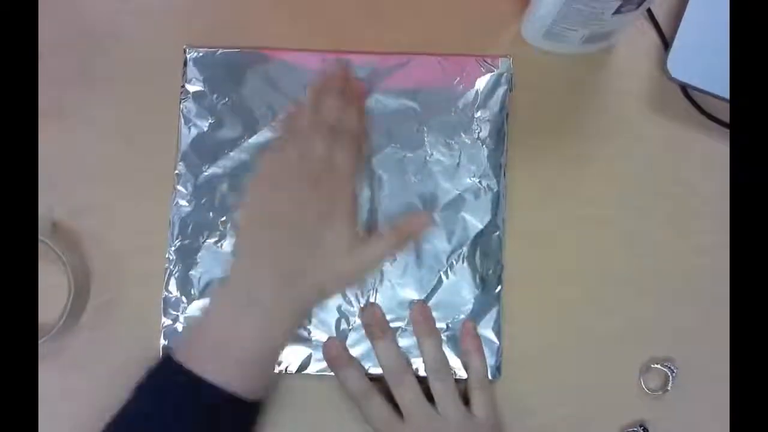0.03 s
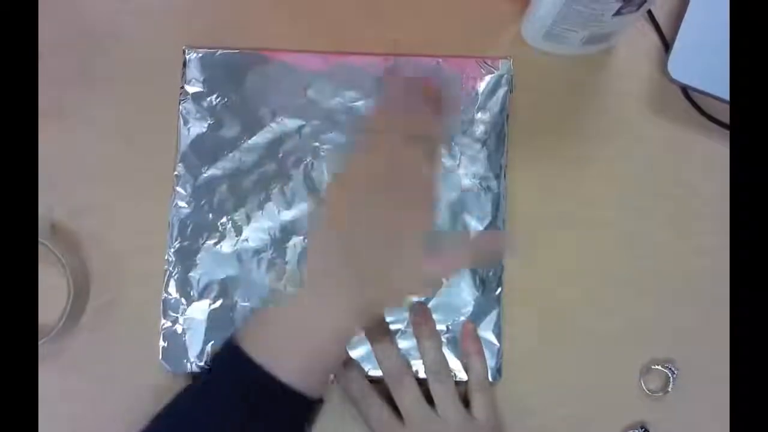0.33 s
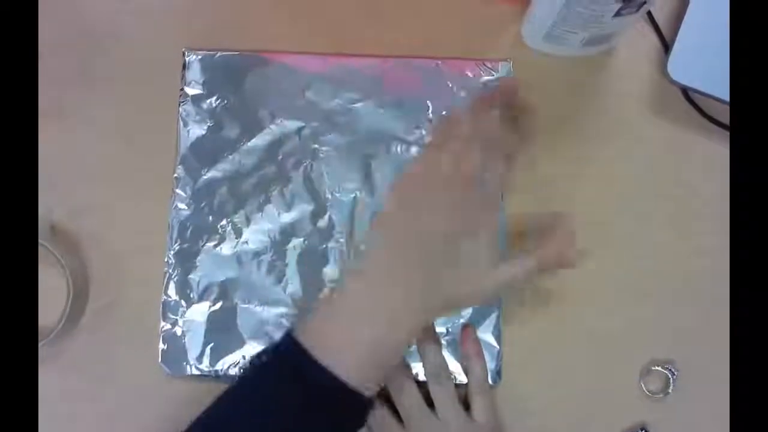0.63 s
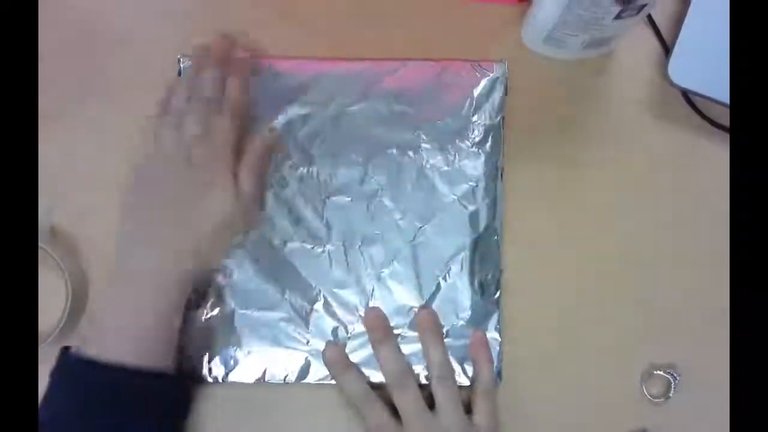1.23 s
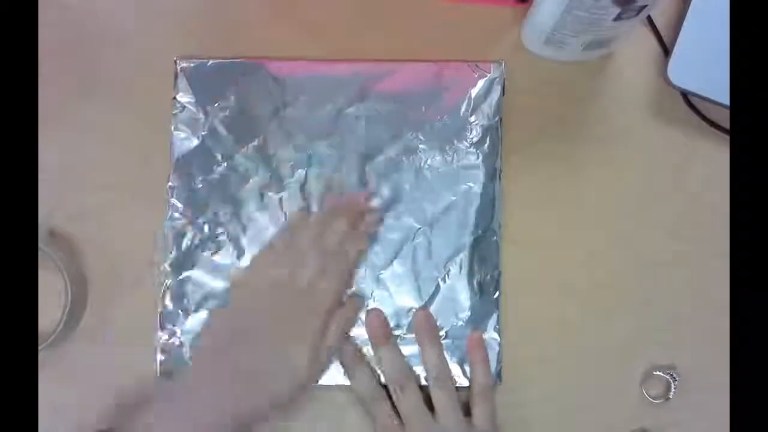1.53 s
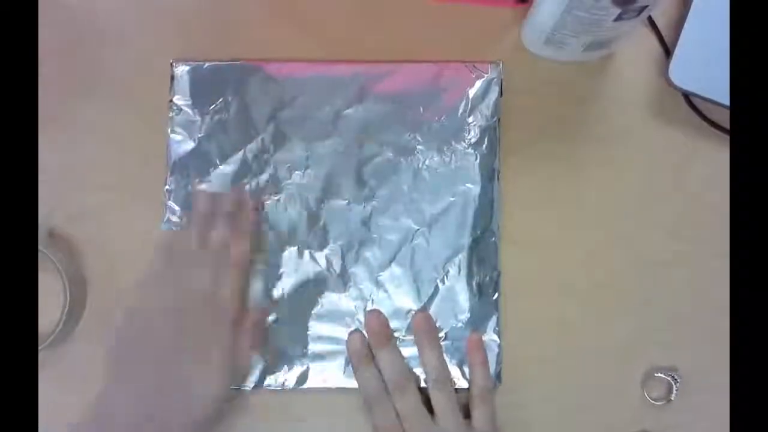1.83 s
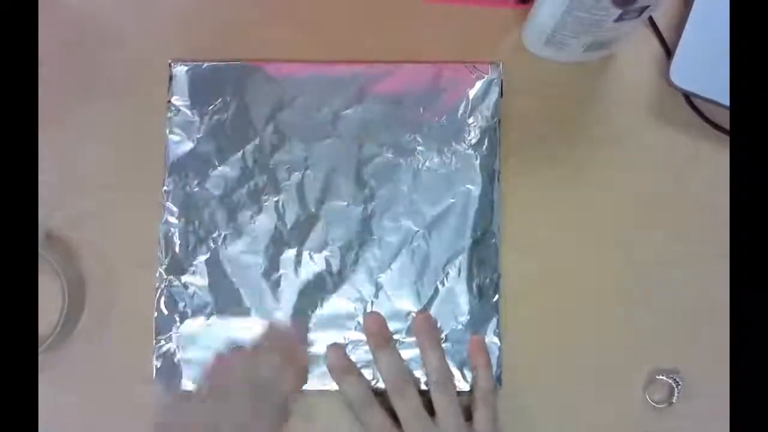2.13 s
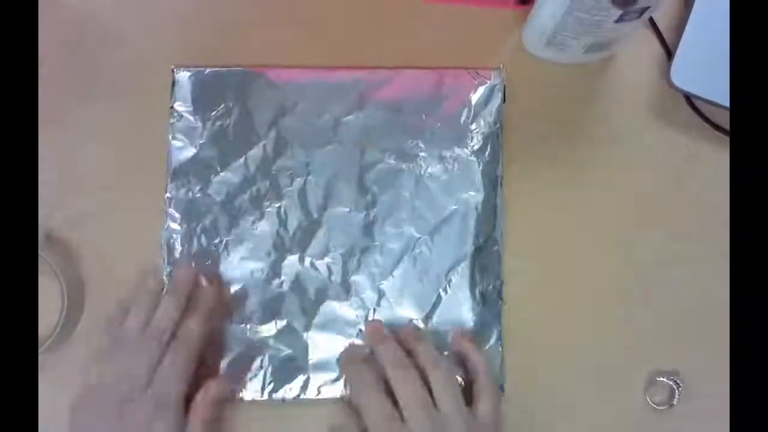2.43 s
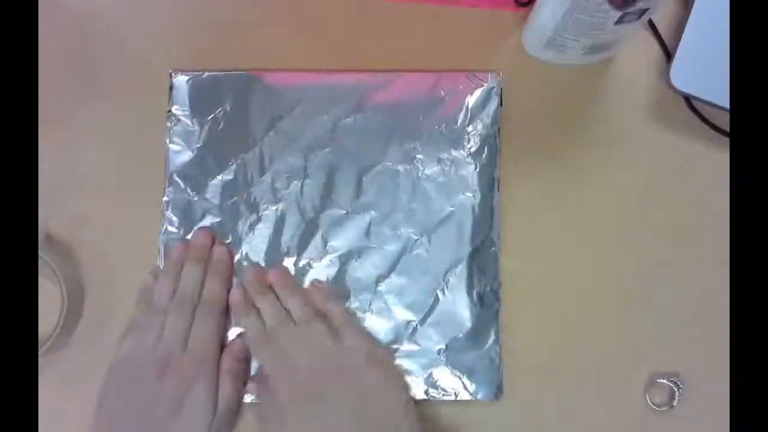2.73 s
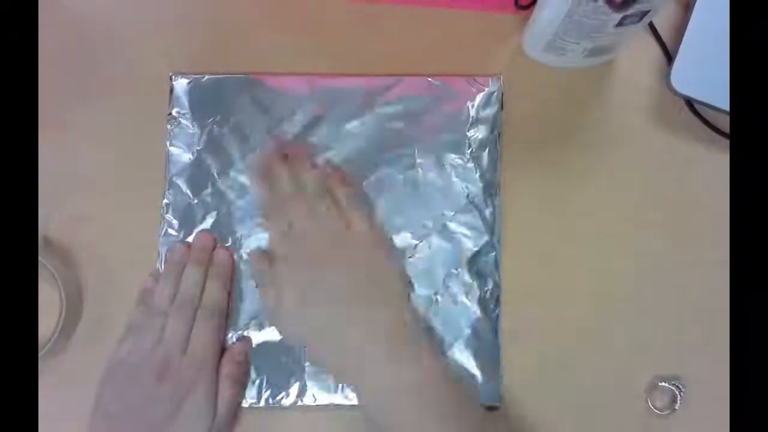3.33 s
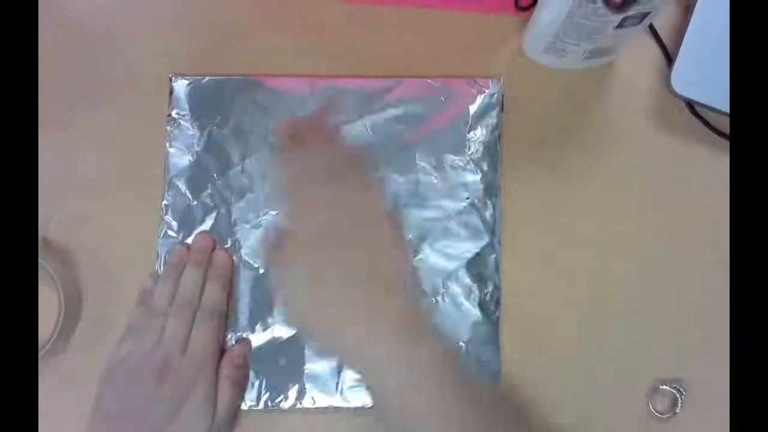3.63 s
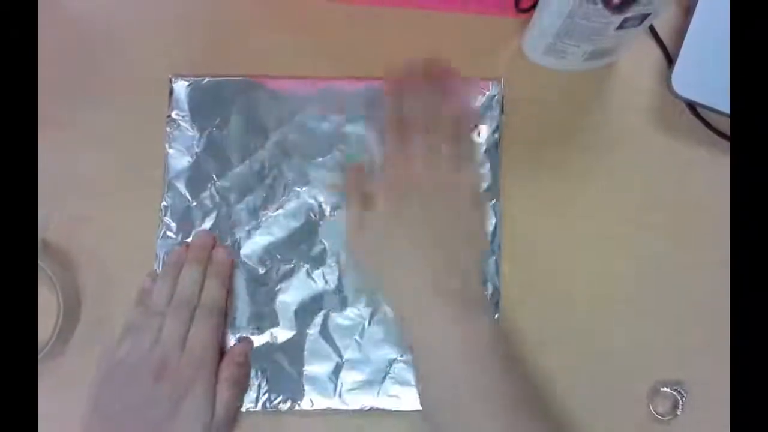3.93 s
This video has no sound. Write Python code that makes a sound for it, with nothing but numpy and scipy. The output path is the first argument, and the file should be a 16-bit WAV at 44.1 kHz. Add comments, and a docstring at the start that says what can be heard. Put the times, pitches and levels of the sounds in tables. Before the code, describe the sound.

Aluminium foil crinkles as a hand smooths it over a board in quick strokes, with a bright fizz and small snaps. It softens midway, then returns stronger, with faint palm bumps on the table, close up in a small room.

```python
"""Crinkled aluminium foil, smoothed by hand over a board on a table, heard close up in a small room.
Each stroke flattens tiny creases: they fizz in the treble, rattle the loose sheet and, under
pressure, scrape the board. Larger creases snap one by one, free facets ping, and the sheet
rustles between strokes. The palm bumps the table; faint room air lies underneath."""
import sys
import numpy as np
from scipy import signal
from scipy.fft import rfft, irfft
from scipy.io import wavfile

SR = 44100
rng = np.random.default_rng(int(sys.argv[2]) if len(sys.argv) > 2 else 0)


def dump(signal):
    """Clip the signal to [-1, 1] and save it as 16-bit WAV at the path in sys.argv[1]."""
    limited = np.clip(np.atleast_2d(signal).T, -1, 1)
    pcm = np.round(limited * 32767).astype(np.int16)
    wavfile.write(sys.argv[1], SR, pcm)


N = 176400

# hand strokes: start_s, crest_s, end_s, fizz_db, rattle_db, scrape_db
STROKES = [(-.02, 0.006, 0.0467, -38.5, -39.5, -55.5), (0.067, 0.124, 0.18, -48.5, -46.5, -66.5),
           (0.252, 0.3, 0.3, -37, -40.5, -56.5), (0.362, 0.381, 0.41, -48, -45, -58.5),
           (0.501, 0.545, 0.5737, -46, -47, -59), (0.636, 0.665, 0.7, -43, -47.5, -64.5),
           (0.799, 0.84, 0.825, -52, -66, -68), (0.872, 0.93, 1.0006, -45, -45.5, -65),
           (0.989, 1.056, 1.0885, -40.5, -42, -61.5), (1.103, 1.123, 1.18, -57, -60, -86),
           (1.27, 1.38, 1.399, -39.5, -40.5, -60), (1.432, 1.433, 1.56, -72, -52.5, -74),
           (1.565, 1.576, 1.597, -47, -45, -89), (1.643, 1.731, 1.745, -55, -47, -71),
           (2.008, 2.007, 2.065, -57.5, -53.5, -76), (2.237, 2.248, 2.237, -53.5, -48, -65),
           (2.3, 2.305, 2.298, -39, -43, -74), (2.363, 2.385, 2.383, -54.5, -51, -84),
           (2.503, 2.504, 2.54, -37, -36, -63), (2.575, 2.583, 2.616, -40.5, -41, -64),
           (2.688, 2.73, 2.745, -46, -43.5, -75.5), (2.739, 2.794, 2.828, -33, -38, -46.5),
           (2.864, 2.917, 2.978, -35, -37, -53.5), (3.013, 3.062, 3.13, -36, -37.5, -52),
           (3.163, 3.212, 3.275, -44, -43, -59.5), (3.324, 3.368, 3.422, -35, -37, -50.5),
           (3.501, 3.539, 3.597, -38, -38.5, -54.5), (3.638, 3.665, 3.663, -39.5, -38.5, -67),
           (3.671, 3.697, 3.738, -36, -36, -50), (3.82, 3.851, 3.896, -45.5, -42.5, -61),
           (3.959, 3.953, 3.9, -54, -51, -76)]
# larger creases: time_s, crack_db, rattle_db, knock_db
SNAPS = [(0.0471, -38, -45, -67), (0.0718, -37, -42, -75), (0.082, -39, -51, -72),
         (0.1184, -41, -41.5, -65), (0.17, -33, -50, -51), (0.2459, -29, -37.5, -52),
         (0.2543, -46.5, -36.5, -61), (0.3036, -36, -33.5, -45.5), (0.3071, -30, -35.5, -46.5),
         (0.3191, -36, -34.5, -40), (0.344, -48.5, -57, -55.5), (0.3591, -35.5, -40, -53),
         (0.3696, -36, -43, -68), (0.3846, -42, -47, -49), (0.4492, -83.5, -50, -57.5),
         (0.4969, -47, -42.5, -78), (0.5095, -30.5, -39, -44.5), (0.5184, -35, -36, -50),
         (0.527, -32, -30, -47), (0.5677, -38, -39, -49), (0.5883, -43, -43.5, -54.5),
         (0.6183, -35, -51, -60), (0.6444, -34.5, -41.5, -73), (0.7581, -78, -50, -64),
         (0.8021, -37, -42, -57), (0.8151, -47, -40, -61), (0.827, -37, -37.5, -64),
         (0.839, -41.5, -55.5, -70), (0.853, -35.5, -40, -56.5), (0.8661, -38, -49, -66),
         (0.8791, -35, -35, -47.5), (0.9132, -39, -46, -51), (0.918, -33, -55.5, -51),
         (1.0096, -35, -43, -71), (1.1178, -37.5, -43, -80.5), (1.1274, -34.5, -39.5, -74),
         (1.1805, -73, -41, -73), (1.194, -44, -51.5, -81), (1.2185, -36, -50, -78.5),
         (1.2499, -42, -39, -73), (1.2779, -43, -40, -77.5), (1.3149, -32.5, -44.5, -55.5),
         (1.4021, -32, -37.5, -56), (1.4394, -37, -46, -74.5), (1.7593, -64, -48, -68),
         (1.8554, -49, -68, -69.5), (1.866, -50, -48, -62), (1.9066, -51, -61.5, -74),
         (1.99, -66, -49, -72), (2.005, -43.5, -45, -66.5), (2.1575, -49.5, -45.5, -84),
         (2.2119, -50.5, -51, -73), (2.2356, -45, -37.5, -64), (2.3053, -38, -40, -76),
         (2.499, -48.5, -31.5, -63.5), (2.7194, -31, -32, -65), (2.7852, -34, -31, -54),
         (3.0906, -27.5, -41, -46.5), (3.133, -35, -44, -48), (3.2028, -39, -31, -65.5),
         (3.2282, -32, -45, -52), (3.3048, -41, -49, -64.5), (3.4916, -50.5, -66, -57.5),
         (3.5098, -35, -38.5, -58), (3.6908, -31.5, -29, -45), (3.7634, -59.5, -31, -50),
         (3.7661, -41, -58.5, -59), (3.79, -67, -39, -75), (3.8298, -28.5, -32, -44.5),
         (3.8771, -37, -32, -56.5), (3.9658, -40.5, -39.5, -74)]
# loose sheet under the moving hand: time_s, level_db
RUSTLE_LEVELS = [(0, -57.5), (.2, -55), (.4, -57), (.445, -67), (.55, -61), (.69, -83), (.735, -70),
                 (.85, -53.5), (1.1, -50.5), (1.165, -63), (1.45, -49.5), (1.6, -52.5), (1.635, -70),
                 (1.7, -47.5), (1.8, -66), (1.93, -59.5), (2.07, -68), (2.125, -70), (2.24, -65),
                 (2.38, -64), (2.44, -76), (2.49, -94), (2.555, -57), (2.8, -50.5), (3.25, -48.5),
                 (3.47, -60), (3.65, -47), (3.8, -56.5), (4, -51.5)]
# fizz as heard, with a fixed notch near 7.4 kHz, probably the microphone's: freq_hz, gain_db
FIZZ_EQ = [(1200, -51), (2500, -27), (4500, -5), (5700, -2), (6500, -4), (7500, -14.5), (8700, -1),
           (10500, 1.5), (12300, 2.5), (14000, 8.5), (15200, 6)]
# rattle as heard, same notch: freq_hz, gain_db
RATTLE_EQ = [(700, -24.5), (1300, -24.5), (1700, -3), (2400, 5.5), (3100, 8), (3600, 4.5), (4200, 1),
             (5500, -3.5), (6500, -11), (7400, -52), (9000, -29), (14500, 1)]
# pings of larger facets as heard, same notch: freq_hz, gain_db
PING_EQ = [(700, -23.5), (1400, -11), (2000, -2), (2550, 8), (3400, 11), (4100, 1), (5500, -1.5),
           (7400, -33), (14000, -16.5)]
# board colour: freq_hz, gain_db
BOARD_EQ = [(60, -9), (130, -10), (170, 5.5), (205, -2.5), (295, 10), (370, 3.5), (460, 3.5), (560, -1),
            (690, -1.5), (900, 12), (1250, 9.5), (1700, 16), (2600, 10.5), (4500, 6), (7400, 5), (9000, 4)]
# bands of rings and pings: edge_hz
BAND_EDGES_HZ = [60, 600, 1300, 2100, 2900, 3800, 5200, 7500, 10000, 12000, 13800, 16000]
# palm on the table: peak_s, level_db, swell_s, pitch_hz
BUMPS = [(0.136, -68, .021, 81), (1.139, -74.5, 0.046, 80.5), (1.478, -65, 0.0141, 84),
         (1.72, -74.5, 0.022, 80), (2.025, -72.5, 0.01, 85), (2.525, -63, 0.013, 81),
         (2.94, -65.5, 0.0373, 82.6), (3.091, -69, 0.032, 83.4), (3.246, -70, 0.0214, 80),
         (3.405, -57, 0.016, 91), (3.721, -53.5, 0.0166, 105)]
# table rumble: freq_hz, gain_db
TABLE_EQ = [(30, -13), (55, 8.5), (72, 20), (88, 31.5), (102, 15.5), (118, 27.5), (145, 14), (300, 13.5),
            (600, -12), (2000, -28)]
# room air: freq_hz, gain_db
AIR_EQ = [(18, -63), (30, -26), (154, -6.5), (228, -10), (296, -5), (404, -10.5), (629, -12.5), (794, -11),
          (1870, -16), (3500, -19), (15000, -24)]

FIZZ_RING_S, SHEET_RING_S, BOARD_RING_S = .00054, .00175, .0035
TREBLE_PING_S, MID_PING_S = .0023, .0034


def foil(t, free_share=.33, rustle_fizz_db=-10, rustle_board_db=-20.5):
    """Crushed creases fizz, rattle and scrape; some spring free and ping. The loose sheet rustles."""
    power = stroke_power(t)
    pressure = np.maximum(np.sqrt(power[0]) / amp(-40.5), .1)
    creases_per_s = 2200 * pressure ** .6
    fizz, rattle, scrape = power * clicks(creases_per_s, spread_db=3)
    rustle = amp(np.interp(t, *np.array(RUSTLE_LEVELS).T)) ** 2
    sprung = clicks(per_s=330, spread_db=4.5)
    free_fizz = free_share * power[0] + amp(rustle_fizz_db) ** 2 * rustle
    treble = ring((1 - free_share) * fizz, FIZZ_RING_S, FIZZ_EQ)
    treble += pings(free_fizz * sprung, TREBLE_PING_S, FIZZ_EQ)
    sheet = ring(rattle, SHEET_RING_S, RATTLE_EQ) + pings(rustle * sprung, MID_PING_S, PING_EQ)
    board = ring(scrape + amp(rustle_board_db) ** 2 * rustle * sprung, BOARD_RING_S, BOARD_EQ)
    return treble + sheet + board


def stroke_power(t, edge_db=-7.5, attack_s=.00354, release_s=.0053):
    """Fizz, rattle and scrape power: each stroke swells to its crest and eases off."""
    power = np.zeros((3, N))
    for start_s, crest_s, end_s, *levels_db in STROKES:
        off_crest = np.interp(t, [start_s, crest_s, end_s], [1, 0, 1])
        outside = np.maximum(start_s - t, 0) / attack_s + np.maximum(t - end_s, 0) / release_s
        envelope = amp(edge_db * off_crest) * np.exp(-np.minimum(outside, 20))
        power += np.outer(amp(levels_db), envelope) ** 2
    return power


def snaps(free_share=.63, snap_s=.0018, buckle_s=.00055, ring_s=.0017):
    """A larger crease buckles in a short burst of tiny slips; its facet pings."""
    energy = np.zeros((3, N))
    for time_s, *levels_db in SNAPS:
        energy[:, int(time_s * SR)] += amp(levels_db) ** 2 * snap_s * SR
    damped = energy * [[1 - free_share], [1 - free_share], [1]]
    slips = fade(fade(damped, buckle_s), buckle_s)
    burst = sum(ring(part, ring_s, eq, shiver_db=-11.5)
                for part, eq in zip(slips, (FIZZ_EQ, RATTLE_EQ, BOARD_EQ)))
    crack, rattle = free_share * energy[:2]
    return burst + pings(crack, TREBLE_PING_S, FIZZ_EQ) + pings(rattle, MID_PING_S, PING_EQ)


def ring(energy, ring_s, eq, shiver_db=-8.5, shiver_s=.0074, wander_db=2):
    """Hand-damped clicks: a short noisy ring, then a faint shiver of the whole sheet."""
    out = 0
    for band_hz in zip(BAND_EDGES_HZ, BAND_EDGES_HZ[1:]):
        share = energy * sizes(spread_db=5)
        share *= amp(wander_db * drift(per_s=27)) ** 2  # the hand covers other facets
        power = fade(share, ring_s) + amp(shiver_db) ** 2 * fade(share, shiver_s)
        bandpass = signal.butter(2, band_hz, "bandpass", fs=SR, output="sos")
        out += signal.sosfilt(bandpass, np.sqrt(power) * rng.standard_normal(N))
    return colour(out, eq)


def pings(energy, ring_s, eq, onset_s=.00028, scatter=.46, samples=500):
    """Free facets ring like tiny plates: one random pitch per click in each band but the lowest."""
    hits = np.flatnonzero(energy)
    age_s = np.arange(samples) / SR
    decay_s = ring_s * np.exp(scatter * rng.standard_normal(N)[hits, None])
    envelope = np.exp(-age_s / decay_s) * (1 - np.exp(-age_s / onset_s))
    envelope *= np.sqrt(energy[hits] / (envelope ** 2).sum(1))[:, None]
    partials = 0
    for low_hz, high_hz in zip(BAND_EDGES_HZ[1:], BAND_EDGES_HZ[2:]):
        place, phase, weight = rng.random((N, 3))[hits].T[:, :, None]
        pitch_hz = low_hz + (high_hz - low_hz) * place
        gain = 2 * np.sqrt((high_hz - low_hz) / SR) * (.5 + weight)
        partials += gain * np.sin(2 * np.pi * (pitch_hz * age_s + phase))
    slots = hits[:, None] + np.arange(samples)
    return colour(np.bincount(slots.ravel(), (envelope * partials).ravel(), N), eq)


def table(t, rest_db=-84, rub_db=-4):
    """Soft palm pushes make the table boom, over a low rumble of rubbing."""
    boom, push = 0, 0
    for peak_s, level_db, swell_s, pitch_hz in BUMPS:
        press = amp(level_db) * np.exp(-.5 * ((t - peak_s) / swell_s) ** 2)
        boom += press * np.sin(2 * np.pi * pitch_hz * (t - peak_s))
        push += press
    rumble = colour(rng.standard_normal(N), TABLE_EQ)
    return boom + (amp(rest_db) + amp(rub_db) * push) * rumble


def room(x, t, t60_s=.2, tail_db=-19.5, delay_s=.004):
    """Direct sound plus a faint tail from the walls."""
    tail = rng.standard_normal(N) * np.exp(-np.log(1000) * t / t60_s) * (t > delay_s)
    return x + amp(tail_db) * signal.fftconvolve(x, tail / np.linalg.norm(tail))[:N]


def air(level_db=-76.5):
    """Steady room noise."""
    noise = colour(rng.standard_normal(N), AIR_EQ)
    return amp(level_db) * noise / noise.std()


def clicks(per_s, spread_db):
    """Energy of randomly timed clicks, mean power 1."""
    chance = np.clip(per_s / SR, 1e-6, 1)
    return (rng.random(N) < chance) * sizes(spread_db) / chance


def sizes(spread_db):
    """Random energy factors, mean 1."""
    energy = amp(spread_db * np.clip(rng.standard_normal(N), -2.5, 2.5)) ** 2
    return energy / energy.mean()


def fade(energy, ring_s):
    """Spread each click's energy over an exponential decay."""
    pole = np.exp(-2 / (ring_s * SR))
    return signal.lfilter([1 - pole], [1, -pole], energy + 1e-18)


def drift(per_s, knots=512):
    """Random wander, spread near 1."""
    return np.interp(np.arange(N) / SR * per_s, np.arange(knots), rng.standard_normal(knots))


def colour(x, eq, taps=8192):
    """Minimum-phase filter through freq_hz, gain_db points."""
    freq_hz, gain_db = np.array(eq, float).T
    bins_hz = np.maximum(np.fft.rfftfreq(taps, 1 / SR), 1)
    gain = amp(np.interp(np.log(bins_hz), np.log(freq_hz), gain_db))
    cepstrum = irfft(np.log(gain))
    cepstrum[1:taps // 2] *= 2
    cepstrum[taps // 2 + 1:] = 0
    impulse = irfft(np.exp(rfft(cepstrum)))
    return signal.fftconvolve(x, impulse)[:N]


def amp(db):
    """Decibels to gain."""
    return 10 ** (np.asarray(db) / 20)


def scene():
    """Foil in the room, table and air; mono."""
    t = np.arange(N) / SR
    return (room(foil(t) + snaps(), t) + table(t) + air())[None]


def record(dry):
    """Steep low-pass on the top treble."""
    cutoff_hz = 15350
    return signal.sosfilt(signal.ellip(10, .2, 70, cutoff_hz, fs=SR, output="sos"), dry)


dry = scene()
out = record(dry)
dump(out)
```